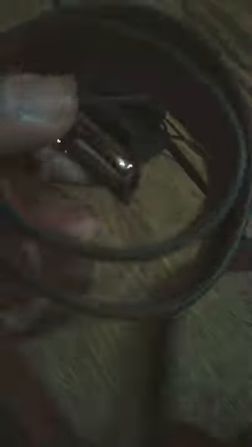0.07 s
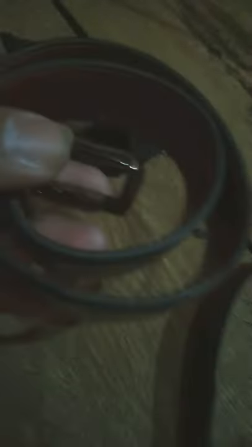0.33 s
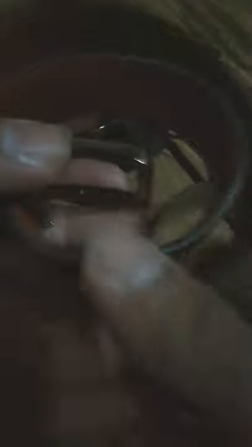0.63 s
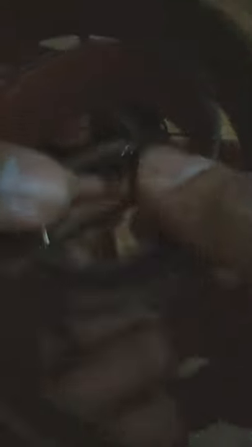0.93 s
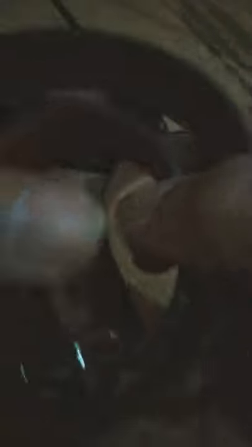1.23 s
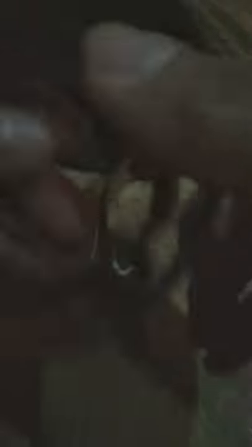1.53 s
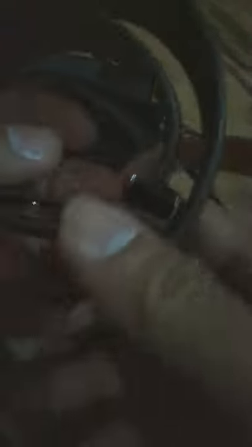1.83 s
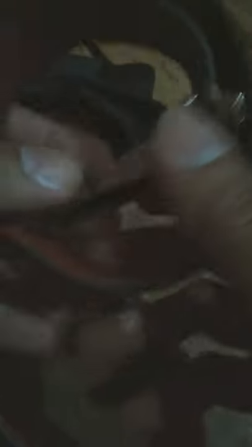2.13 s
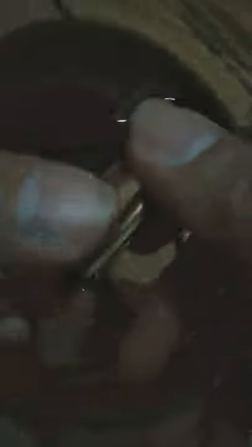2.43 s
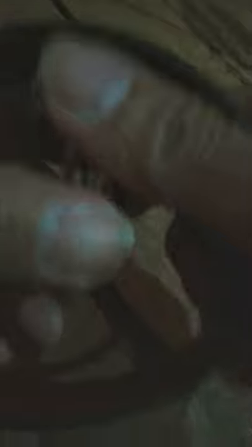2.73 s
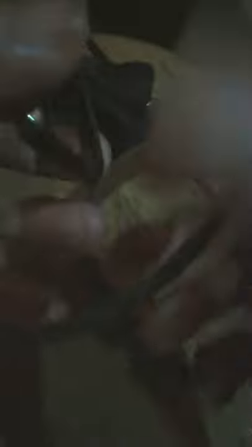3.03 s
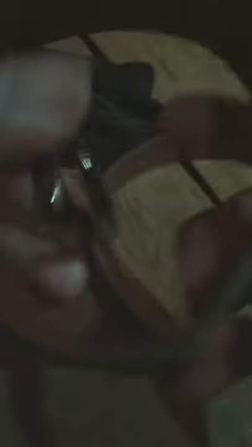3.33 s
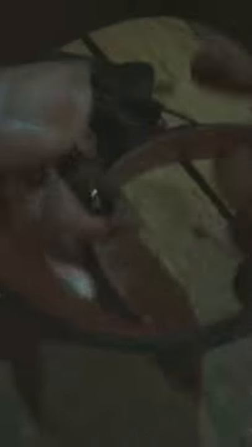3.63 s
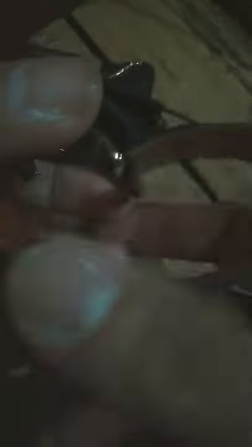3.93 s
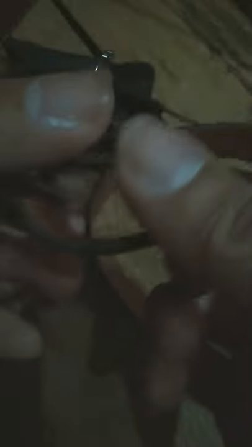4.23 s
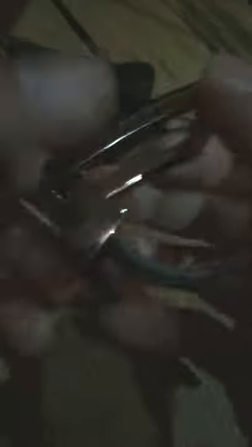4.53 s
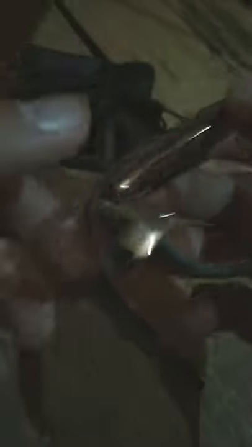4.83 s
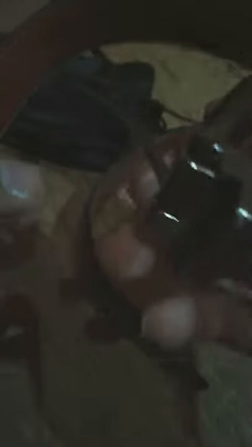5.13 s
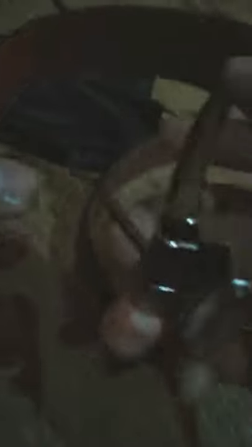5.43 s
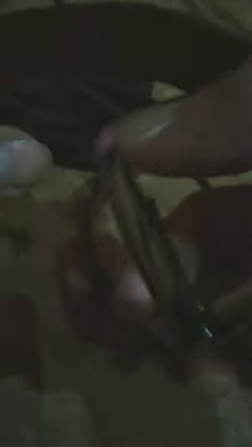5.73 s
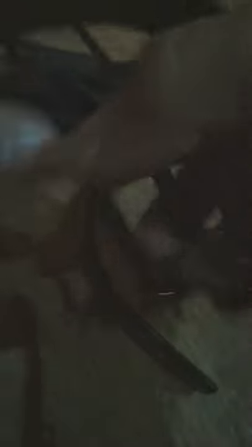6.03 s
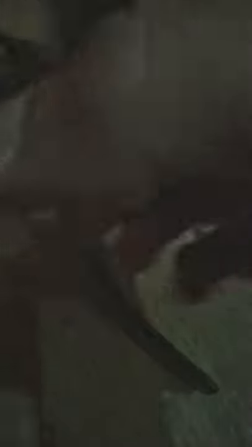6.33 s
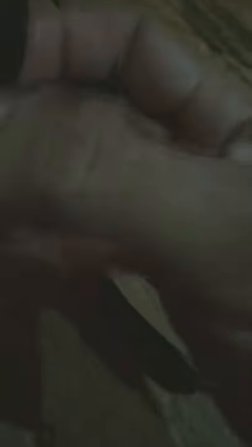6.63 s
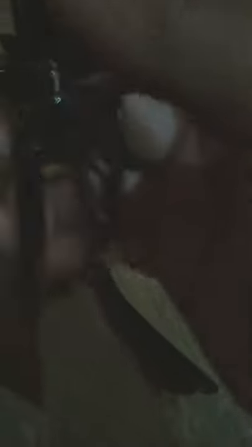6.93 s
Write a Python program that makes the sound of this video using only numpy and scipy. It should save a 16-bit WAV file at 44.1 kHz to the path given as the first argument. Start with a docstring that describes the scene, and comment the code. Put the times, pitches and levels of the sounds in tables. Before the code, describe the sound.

A few knocks and taps on a wooden table open the sound, followed by damped clicks of a belt buckle held in the fingers. Leather slides softly, with tiny creaks and metal scrapes. In the second half, handling thumps hit the nearby microphone, mostly on the right, ending in one loud clack and brighter jingling. The room is small, with light hiss and the low hum of a faraway engine slowing down.

```python
"""A knock on a wooden table in a small room, over soft hiss and a distant, slowing engine.
Hands work a leather belt through its metal buckle: contacts ring prong and frame, damped to clicks
in the grip, jingling once loose. The strap rubs and drags; tiny slips make metal scrape and leather creak.
Later, bumps ring the case of the camera close by, and the buckle hits it once, hard."""
import sys
import numpy as np
from scipy import signal
from scipy.fft import rfft, irfft, next_fast_len
from scipy.io import wavfile
from scipy.ndimage import map_coordinates

SR = 44100
rng = np.random.default_rng(int(sys.argv[2]) if len(sys.argv) > 2 else 0)


def inscribe(sig):
    """Save sig as 16-bit PCM at rate SR to the path in sys.argv[1].

    A 1-D sig is mono; a 2-D sig holds one channel per row.
    Samples are clipped to [-1, 1] before scaling.
    """
    pcm = np.round(np.clip(np.atleast_2d(sig).T, -1, 1) * 32767)
    wavfile.write(sys.argv[1], SR, pcm.astype(np.int16))


N = 316638
T = np.arange(int(.4 * SR)) / SR  # time within one event [s]

# blows on wood (time [s], level [dB], brightness [dB])
KNOCKS = [(0.004, -28, -17), (0.421, -34, -11.5), (0.4435, -21, -4), (0.469, -24, -19), (0.958, -32.5, -12),
          (0.988, -31.5, -28), (1.046, -37, -15), (1.331, -46, 0), (1.838, -26, -4.5), (2.2745, -27.5, -8),
          (2.426, -38.5, -6), (2.516, -35.5, -9.5), (3.407, -36.5, -5), (3.87, -38, -12.5),
          (4.775, -36, -13), (5.229, -37, -18), (6.306, -36.5, -14)]
# wooden blow (frequency [Hz], level [dB])
WOOD_SPECTRUM = [(80, -8.5), (170, -1.5), (310, -0.5), (500, -5.5), (800, -10.5), (1300, -10.5),
                 (1900, -16.5), (2600, -22), (5000, -49)]
BOARD_DB, BOARD_HZ, BOARD_T60_S, KNOCK_PAN_DB = -6.5, 204, 0.063, 1.5
# finger and strap taps (time [s], level [dB], pitch [Hz], t60 [s])
TAPS = [(.0055, -22, 514, 0.02), (0.9669, -25.5, 340, 0.042), (.995, -26, 161, 0.07),
        (1.052, -33.5, 328, 0.036), (2.277, -29, 225, 0.06), (2.2855, -25, 335, 0.04),
        (4.473, -43, 593, 0.0092), (4.481, -31, 590, 0.0089)]
# room decay (frequency [Hz], t60 [s])
ROOM_DECAY = [(150, 0.47), (600, 0.36), (3000, 0.41), (8000, 0.35), (15000, 0.22)]

# engine run (time [s], cycle rate [Hz], level [dB], boom centre [Hz])
ENGINE_RUN = [(0, 27.02, -66, 110), (.5, 26.5, -54, 104), (1.05, 26.69, -57, 113), (1.35, 26.75, -53, 132),
              (2.2, 26.6, -51.5, 134), (2.55, 25.76, -59, 134.5), (2.85, 24, -55, 143),
              (3.6, 23.75, -57, 144), (4.3, 22.2, -58.5, 134), (5.2, 21.63, -62, 134.7),
              (7.18, 21.05, -69, 138)]
# exhaust response (frequency [Hz], level [dB])
EXHAUST_SPECTRUM = [(42, -12), (54, -2.5), (70, 5), (82, -6.5), (95, -1.5), (110, -1), (122, 1.5),
                    (160, -8), (188, -6), (214, -15.5), (240, -9), (268, -10.5), (294, -8), (325, -20)]
BOOM_DB, BOOM_WIDTH_HZ = 9.5, 7.1
# rumble envelope (time [s], level [dB])
RUMBLE_LEVELS = [(0, -48), (1.3, -50.5), (2.6, -50.5), (3.6, -50), (4.3, -55.5), (5.6, -55), (7.18, -54)]
# rumble (frequency [Hz], level [dB])
RUMBLE_SPECTRUM = [(30, -37), (55, 8), (90, -1), (140, 1.5), (200, -8.5), (300, -4.5), (450, -14.5),
                   (800, -24.5), (1500, -41)]
# hiss (frequency [Hz], level [dB])
HISS_SPECTRUM = [(350, -8), (600, -1), (1180, -5.5), (2950, -6), (3980, -10), (4900, -6), (8180, -24),
                 (10000, -10.5), (11300, -7.5), (15500, -14)]

# metal contacts (time [s], level [dB], low ping [dB], sheen [dB], left minus right [dB])
CLICKS = [(0.143, -38, -3, -12, 2), (0.4425, -38.5, 10, 4, 5.5), (0.8036, -23.5, -11, -9, 0.5),
          (0.824, -32.5, -1, -7, 1), (0.9844, -36.5, -7, -6, 0), (1.2794, -50.5, 6, 2, 8),
          (1.3338, -35.5, 0, -18, 2), (1.3629, -37.5, -11, -17, 7), (1.5056, -41, -3, -7, 0),
          (1.5383, -32, -1.5, -9, 1.5), (1.5965, -27, -3.5, -4, -2), (1.629, -43.5, 1, -18, 8),
          (1.7067, -38, -2.5, -1.5, -4), (1.7393, -46, -7.5, -6, 2), (1.764, -41.5, -9, -6, 0),
          (1.7863, -42.5, -3, -8, -1), (1.808, -46.5, 4.5, -15, 0), (1.838, -43, -3, -8, 1),
          (1.851, -30, -2.5, -2, -2), (1.872, -32.5, -7, -11, 2), (1.8873, -28, -6, -4, 3),
          (1.908, -35, -8, -3, -1), (2.227, -46, 6, 2, 2), (2.284, -43.5, -6.5, -11, 4),
          (2.3411, -28, -5.5, -9.5, 1.5), (2.391, -36.5, -12, -6, 3), (2.5206, -32, -5, -11, 2.5),
          (2.575, -46.5, 6, -10, -1), (2.7607, -45, 2, -13, 1), (2.8266, -46.5, -9.5, -19, 1),
          (3.029, -35.5, -1, -8, 2), (3.0635, -40, -10.5, -13, 2), (3.1459, -40.5, -4, -3, 0),
          (4.164, -37, -7, -12, 4), (4.1842, -35.5, -1, -6, 1), (4.209, -43, -6, -9, 4),
          (4.258, -43, 0, -11, 5), (4.466, -41, -5, 0, 3), (4.484, -45.5, -4, -9, 9),
          (4.7476, -42, -11, -16, 4), (4.7902, -39.5, -8, -9, 6), (5.0457, -24, -8.5, -4.5, 3.5),
          (5.777, -41, -8.5, -10, 6), (5.8066, -26, -7.5, -8, 2), (6.176, -48.5, 3, 4, 4),
          (6.3326, -46, -4, -7, 2), (6.354, -43.5, 7, -8, -2), (6.4703, -32, -11.5, -6, 3.5),
          (6.508, -36.5, -6, -12, 2), (6.5377, -25.5, -12, -7.5, 2.5), (6.559, -41, -6, -4, 4),
          (6.57, -29.5, -10, -5, -2.5), (6.6131, -19.5, -7.5, -4.5, -0.5), (6.633, -25.5, -22, -5, 2),
          (6.7835, -24.5, -16, -1.5, 1), (6.961, -27.5, -13.5, -3, 2.5), (6.981, -30, -11, -5, 1),
          (7.0227, -26, -17, 1.5, 1.5), (7.0491, -35.5, -9.5, -13, 1.5), (7.0897, -33, -17, -5, 0),
          (7.1179, -32.5, -6, -7.5, 0.5)]
# metal contact (frequency [Hz], level [dB])
METAL_SPECTRUM = [(600, -4), (1500, -6.5), (3000, 0.5), (4400, 3), (6000, -4.5), (7800, -11), (10000, -1),
                  (13500, 3), (16000, -9.5)]
# buckle freedom (time [s], frame ring [dB], chatter stretch [ratio])
LOOSENESS = [(0, -30, 1.33), (1.848, -29, 1.42), (2.4, -30, 1.67), (4.5, -31, 0.95), (5.05, -41, 1.04),
             (5.9, -66, 0.96), (6.47, -20.5, 2.14), (6.6, -17, 1.64), (6.8, -26, 2.36), (6.96, -27, 1.9),
             (7.1, -25, 2.04)]
# prong freedom between the fingers (time [s], prong ring [dB])
PRONG_FREEDOM = [(.44, -26), (1.35, -20), (1.6, -22), (1.71, -4.5), (1.86, -6), (2.0, -20), (4.2, -22),
                 (5.05, -36), (6.5, -19), (7.1, -17)]
# buckle frame (frequency [Hz], level [dB], t60 [s])
FRAME_MODES = [(3050, -15, .14), (3460, -16, .22), (3580, -14, .3), (4255, -7, .3), (4330, -10, .24),
               (4430, -13, .17), (4985, -20, .25), (7004, -20, .35), (9570, -6, .25), (10280, -7, .38),
               (10700, -4, .33), (11815, -13, .2), (12370, -5, .18), (13545, -2, .18), (13955, -3, .16),
               (15430, -16, .2)]
# buckle prong (frequency [Hz], level [dB], t60 [s])
PRONG_MODES = [(3577, 0, 0.065), (3640, -2, .05), (4400, -1.5, 0.031), (5020, -6, 0.032)]
# modes singled out by hard contacts (time [s], frequency [Hz], level [dB])
PINGS = [(0.803, 9750, -31), (1.5384, 4380, -36.5), (1.5964, 12700, -32), (1.597, 13100, -32),
         (1.764, 9370, -41), (1.851, 3580, -40), (1.8873, 10400, -39), (1.8873, 12500, -32),
         (2.3411, 3090, -35), (2.3408, 4230, -32), (2.3411, 6470, -35), (5.0463, 6050, -38),
         (5.0455, 12150, -29), (5.8067, 13500, -34), (6.4703, 10700, -26), (6.5378, 10250, -30),
         (6.7837, 4260, -37.5), (6.961, 13560, -27), (7.0225, 10740, -33)]
TYPICAL_CONTACT_DB, PRESS_DAMPING_DB_PER_DB = -35.5, 0.21  # parts pressed harder ring less
SKID_DB, SKID_DECAY_S, PING_T60_S = -21, .012, 0.026  # at a chatter stretch of 1
SLIPS_PER_S, SLIP_DECAY_S = 330, 0.0024

# strap sliding on skin (centre [s], half length [s], level [dB])
SWISHES = [(.18, 0.09, -58), (0.425, 0.016, -62), (0.637, 0.34, -60.5), (1.24, 0.16, -60),
           (1.426, 0.095, -57.5), (2.144, 0.094, -59.5), (2.68, 0.17, -60.5), (2.92, 0.062, -57.5),
           (3.68, 0.088, -60), (4.058, 0.053, -60.5), (4.43, 0.054, -56.5), (4.775, .03, -54),
           (5.12, 0.037, -58), (6.266, .041, -62.5)]
# sliding leather (frequency [Hz], level [dB])
LEATHER_SPECTRUM = [(1000, -6.5), (2500, -4), (4500, -2), (7500, -15), (10500, -0.5), (13000, 0.5),
                    (15500, -7.5)]
# strap dragging on wood (centre [s], half length [s], level [dB])
DRAGS = [(.19, 0.054, -42.5), (.68, 0.092, -43.5), (1.0, .025, -40.5), (4.59, .025, -55),
         (4.675, 0.032, -54.5)]
# dull drag (frequency [Hz], level [dB])
DRAG_SPECTRUM = [(120, -0.5), (220, -5.5), (360, -0.5), (560, -7.5), (850, -21.5), (1600, -40)]
# finger rubbing the strap (centre [s], half length [s], level [dB])
FINGER_RUB = (4.15, 0.77, -71.5)
# rubbing skin (frequency [Hz], level [dB])
SKIN_SPECTRUM = [(4500, -25), (5300, -2), (6300, -21)]

# metal sliding on metal (centre [s], half length [s], level [dB])
SCRAPES = [(1.354, 0.051, -50.5), (1.87, 0.022, -43), (2.735, 0.11, -58.5), (4.208, 0.047, -52.5),
           (6.314, 0.058, -56), (6.551, 0.047, -45), (6.632, 0.025, -38.5), (6.974, 0.021, -42),
           (7.112, 0.027, -55)]
SCRAPE_BODY_DB, THINNING_DB_PER_DB = -1.5, 0.29  # body at typical contact level; loss above it
# leather creaks (centre [s], level [dB], pitch [Hz])
CREAKS = [(3.432, -53, 3400), (3.465, -53, 3150), (3.716, -46, 2040), (4.262, -49, 2370),
          (4.765, -48, 2020)]
# creak body (frequency / pitch [ratio], level [dB])
CREAK_SPECTRUM = [(.6, -25), (.88, -9), (1, 5.5), (1.18, -10), (1.35, -3), (1.7, -12), (4, -19.5)]
CREAK_HALF_S = 0.0066

# camera bumps (time [s], level [dB], thud [dB], case pitch [Hz])
BUMPS = [(4.516, -31.5, -2.5, 415), (4.695, -39, -8, 502), (4.853, -26.5, -3.5, 419),
         (5.166, -17, -15, 445), (5.788, -21, -1, 324), (6.259, -17, 1, 339), (6.343, -39, 8, 343),
         (6.86, -43.5, 5.5, 350)]
# camera case (frequency / case pitch [ratio], level [dB])
CASE_MODES = [(.68, -5.5), (1, 3), (1.3, -7.5)]
CASE_T60_S, FLESH_DAMPING = 0.04, 0.22  # t60 at 0 dB thud; fleshier bumps die sooner
# soft contact on the case (frequency [Hz], level [dB])
PUFF_SPECTRUM = [(60, -4), (140, 10), (450, 1), (700, -16), (1200, -24.5), (2200, -48)]
# case under a hard blow (frequency [Hz], level [dB], t60 [s])
CLACK_MODES = [(690, -13, 0.014), (1540, -5.5, 0.032), (1705, -4.5, 0.017), (3040, -3.5, 0.025),
               (3660, -6, 0.013)]
LOW_CUT_HZ, HIGH_CUT_HZ = 37, 15900


def amp(db):
    """Decibels to gain."""
    return 10 ** (np.asarray(db) / 20)


def unit(x):
    """Scale to rms 1."""
    return x / np.sqrt(np.mean(x ** 2) + 1e-20)


def along(points, hz):
    """Read (frequency [Hz], value) points on a log axis."""
    f, v = np.transpose(points)
    return np.interp(np.log(hz + 1), np.log(f), v)


def curves(rows):
    """One value per sample for each column after the time."""
    s, *cols = np.transpose(rows)
    return [np.interp(np.arange(N) / SR, s, c) for c in cols]


def wobble(rate_hz):
    """Smooth random curve, rate_hz knots a second."""
    s = np.arange(0, N / SR, .002)
    smooth = map_coordinates(rng.standard_normal(4096), [s * rate_hz], mode="wrap")
    return np.interp(np.arange(N) / SR, s, smooth)


def filtered(x, gain):
    """Apply a frequency-dependent gain."""
    n = x.shape[-1]
    m = next_fast_len(n + 4096)
    return irfft(rfft(x, m) * gain(np.fft.rfftfreq(m, 1 / SR)), m)[..., :n]


def noise(spectrum, size, tilt=((1, 0), (2, 0))):
    """Stereo noise, rms 1: channels alike in the bass, unrelated in the treble."""
    def colour(hz):
        coherence = along([(130, 0.77), (300, 0.85), (700, 0)], hz)
        angle = np.arccos(coherence) / 2
        return amp(along(spectrum, hz) + along(tilt, hz)) * [np.cos(angle), np.sin(angle)]
    mid, side = filtered(rng.standard_normal((2, size)), colour)
    return unit(np.array([mid + side, mid - side]))


def panned(db):
    """Stereo gains for a left minus right level."""
    return amp([[db / 2], [-db / 2]])


def ring(hz, t60_s, phase=0, t=T):
    """One decaying mode."""
    return np.sin(2 * np.pi * hz * t + phase) * amp(-60 * t / t60_s)


def bank(modes):
    """One ringing row per mode."""
    return np.array([amp(db) * ring(hz, t60_s) for hz, db, t60_s in modes])


def swell(centre, half_width, x):
    """Bell curve, 1/e at half_width from the centre."""
    return np.exp(-((x - centre) / half_width) ** 2)


def add(track, s, sound):
    """Mix a sound in at time s."""
    part = track[:, max(round(s * SR), 0):][:, :sound.shape[-1]]
    part += sound[:, :part.shape[1]]


def in_room(x, wet_db):
    """Direct sound plus a diffuse tail."""
    hz, t, bins = signal.stft(noise([(1, 0), (2, 0)], len(T)), SR, nperseg=256)
    decay = amp(-60 * t / along(ROOM_DECAY, hz)[:, None])
    tail = signal.istft(bins * decay, SR, nperseg=256)[1][:, :len(T)]
    tail *= 1 - np.exp(-T / 0.0054)  # reflections build up
    return x + amp(wet_db) * signal.oaconvolve(x, tail / np.linalg.norm(tail[0]), axes=1)[:, :N]


def knocks():
    """Cushioned blows on wood excite the table top's low note."""
    out, t = np.zeros((2, N)), T[:4096]
    envelope = (1 - np.exp(-(t / 0.00056) ** 2)) * amp(-60 * t / 0.06)
    board = amp(BOARD_DB) * ring(BOARD_HZ, BOARD_T60_S, t=t)
    for s, db, bright_db in KNOCKS:
        blow = noise(WOOD_SPECTRUM, len(t), tilt=[(600, 0), (1400, bright_db)])
        add(out, s, amp(db) * panned(KNOCK_PAN_DB) * (blow * envelope + board))
    return in_room(out, wet_db=-2.5)


def taps():
    """Fingers and strap tap close by: a few quickly damped cycles."""
    out = np.zeros((2, N))
    for s, db, hz, t60_s in TAPS:
        add(out, s, amp(db) * panned(KNOCK_PAN_DB) * ring(hz, t60_s))
    return in_room(out, wet_db=-12)


def engine(top_harmonic):
    """Wavering harmonics of the cycle rate, shaped by the exhaust and a drifting boom."""
    step = 16  # decimation
    cycle_hz, level_db, boom_hz = np.array(curves(ENGINE_RUN))[:, ::step]
    cycle_hz = cycle_hz + 0.068 * wobble(12)[::step]
    phase = 2 * np.pi * np.cumsum(cycle_hz) * step / SR
    drone = np.zeros(len(phase))
    for k in range(2, top_harmonic + 1):
        boom_db = BOOM_DB * swell(boom_hz, BOOM_WIDTH_HZ, k * cycle_hz)
        db = level_db + along(EXHAUST_SPECTRUM, k * cycle_hz) + boom_db + 1.48 * wobble(10)[::step]
        drone += amp(db) * unit(np.sin(k * phase + 2 * np.pi * rng.random()))
    return np.interp(np.arange(N) / step, np.arange(len(drone)), drone)


def background():
    """Distant engine, its rumble and a steady hiss."""
    rumble_db, = curves(RUMBLE_LEVELS)
    rumble = amp(rumble_db + 1.53 * wobble(4.41)) * noise(RUMBLE_SPECTRUM, N)
    return (engine(top_harmonic=13) + rumble) * panned(2.5) + amp(-64.5) * noise(HISS_SPECTRUM, N)


def grit(size):
    """Friction: a dense run of tiny slips, rms 1."""
    slips = (rng.random(size) < SLIPS_PER_S / SR) * rng.uniform(0.17, 1, size)
    return unit(signal.lfilter([1], [1, -np.exp(-1 / (SLIP_DECAY_S * SR))], slips))


def gripped(modes, detune):
    """Ringing modes, each pulled slightly off pitch by the grip."""
    return bank([(hz * (1 + detune * rng.standard_normal()), db, t60_s) for hz, db, t60_s in modes])


def struck(rows, scatter_db):
    """A contact feeds each mode with a random strength and sign per channel."""
    shape = (2, len(rows))
    return (amp(rng.normal(0, scatter_db, shape)) * rng.choice([-1, 1], shape)) @ rows


def ping_cluster(tilt, t, t60_s, count):
    """Damped metal resonances, random for each point of contact."""
    hz = rng.uniform(2500, 15500, (count, 1))
    waves = amp(along(METAL_SPECTRUM, hz) + along(tilt, hz)) * np.sin(2 * np.pi * hz * t)
    return unit(struck(waves, scatter_db=3.5)) * amp(-60 * t / t60_s)


def buckle():
    """Contacts chatter, skid and ring prong and frame; the hardest single out a mode."""
    out, t = np.zeros((2, N)), T[:3072]
    loose_s, free_db, stretches = np.transpose(LOOSENESS)
    finger_damping = 1 + 3 * np.exp(-T / 0.0066)  # most of the ring is soaked up at once
    for s, db, low_db, sheen_db, pan_db in CLICKS:
        stretch = np.interp(s, loose_s, stretches)
        pressed_db = PRESS_DAMPING_DB_PER_DB * (db - TYPICAL_CONTACT_DB)
        frame_db = np.interp(s, loose_s, free_db) - pressed_db
        prong_db = np.interp(s, *np.transpose(PRONG_FREEDOM)) + low_db - pressed_db
        tilt = [(5500, low_db), (8500, 0), (10500, 0), (12500, sheen_db)]
        snap = 0.59 * np.exp(-t / 0.00047)
        chatter = (snap + np.exp(-(t / (0.0036 * stretch)) ** 2)) * (1 - np.exp(-t / 0.00061))
        skid = amp(SKID_DB) * stretch * np.exp(-t / (SKID_DECAY_S * stretch)) * grit(len(t))
        crack = 0.71 * noise(METAL_SPECTRUM, len(t), tilt) * (chatter + skid)
        crack += .6 * ping_cluster(tilt, t, t60_s=0.023 * stretch, count=20)
        prong = struck(gripped(PRONG_MODES, detune=0.011), scatter_db=3.5)
        frame = struck(gripped(FRAME_MODES, detune=0.0018), scatter_db=5) * finger_damping
        tones = amp(frame_db) * frame + amp(prong_db) * prong
        for sound in (crack, tones):
            add(out, s + .0005, amp(db) * panned(pan_db) * sound)
    for s, hz, db in PINGS:
        t60_s = PING_T60_S * np.interp(s, loose_s, stretches)
        add(out, s + .0005, amp(db) * ring(hz, t60_s, phase=rng.uniform(0, 2 * np.pi, (2, 1))))
    return in_room(out, wet_db=-13.5)


def strokes(rows):
    """Envelope of summed bell-shaped strokes."""
    t = np.arange(0, N / SR, .001)
    envelope = sum(amp(db) * swell(s, half_s, t) for s, half_s, db in rows)
    return np.interp(np.arange(N) / SR, t, envelope)


def strap():
    """Leather swishes over skin and drags on wood; a finger rubs faintly along it."""
    swish = strokes(SWISHES) * amp(2.2 * wobble(65)) * noise(LEATHER_SPECTRUM, N) * panned(2.8)
    rub = strokes([FINGER_RUB]) * amp(2.4 * wobble(10)) * noise(SKIN_SPECTRUM, N)
    drag = strokes(DRAGS) * amp(2.8 * wobble(45)) * noise(DRAG_SPECTRUM, N)
    return swish + rub + drag


def scrapes():
    """Metal slips on metal, thinner the harder it is pulled."""
    out, mid_s = np.zeros((2, N)), T.mean()
    for s, half_s, db in SCRAPES:
        body_db = SCRAPE_BODY_DB - THINNING_DB_PER_DB * (db - TYPICAL_CONTACT_DB)
        slips = amp(db) * swell(mid_s, half_s, T) * grit(len(T))
        add(out, s - mid_s, slips * noise(METAL_SPECTRUM, len(T), tilt=[(4500, body_db), (9000, 0)]))
    return out


def creaks():
    """Bending leather slips in bursts, with a hollow pitch."""
    out, mid_s = np.zeros((2, N)), T.mean()
    for s, db, hz in CREAKS:
        body = noise([(hz * ratio, level_db) for ratio, level_db in CREAK_SPECTRUM], len(T))
        add(out, s - mid_s, amp(db) * swell(mid_s, CREAK_HALF_S, T) * grit(len(T)) * body)
    return in_room(out, wet_db=-7)


def bumps():
    """Bumps ring the camera case over a low thud and dull puff, mostly on the right."""
    out = np.zeros((2, N))
    attack = 1 - np.exp(-(T / 0.0021) ** 2)
    thud = ring(hz=87, t60_s=0.15)
    for s, db, thud_db, case_hz in BUMPS:
        t60_s = CASE_T60_S * amp(-FLESH_DAMPING * thud_db)
        case = sum(amp(mode_db) * ring(case_hz * ratio, t60_s) for ratio, mode_db in CASE_MODES)
        puff = .5 * noise(PUFF_SPECTRUM, len(T)) * amp(-60 * T / 0.11)
        add(out, s, amp(db) * amp([[-14], [0]]) * (case + amp(thud_db) * (thud + puff)) * attack)
    return out


def jolt(s, db):
    """The buckle hits the camera: a sharp clack, and a hard push that leaves a low, quickly fading ring."""
    out = np.zeros((2, N))
    shove = 2.5 * np.exp(-T / 0.002)
    push_ring = (ring(hz=49, t60_s=0.11, phase=np.pi / 8) - shove) * (1 - np.exp(-T / 0.00027))
    clack = bank(CLACK_MODES).sum(axis=0) + .5 * noise(WOOD_SPECTRUM, len(T)) * amp(-60 * T / 0.04)
    add(out, s, amp(db) * (amp([[-26], [0]]) * push_ring + amp([[-21.5], [-9.5]]) * clack))
    return out


def scene():
    """Everything on and around the table."""
    metal = buckle() + scrapes()
    impacts = knocks() + taps() + bumps() + jolt(s=6.6137, db=-7)
    return metal + impacts + strap() + creaks() + background()


def record(dry):
    """The camera cuts the deepest bass and the top treble."""
    lean = signal.sosfilt(signal.butter(2, LOW_CUT_HZ, "high", fs=SR, output="sos"), dry)
    return filtered(lean, lambda hz: 1 / np.sqrt(1 + (hz / HIGH_CUT_HZ) ** 100))


dry = scene()
out = record(dry)
inscribe(out)
```